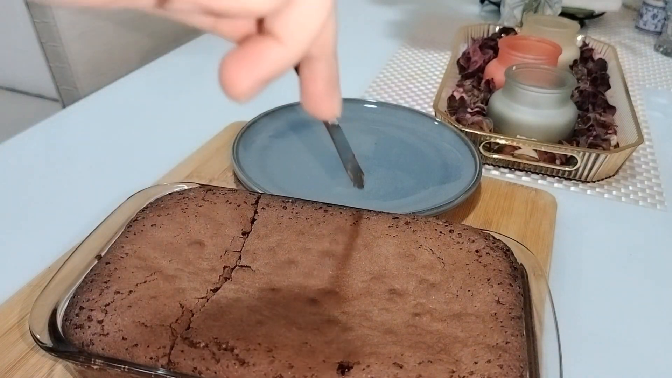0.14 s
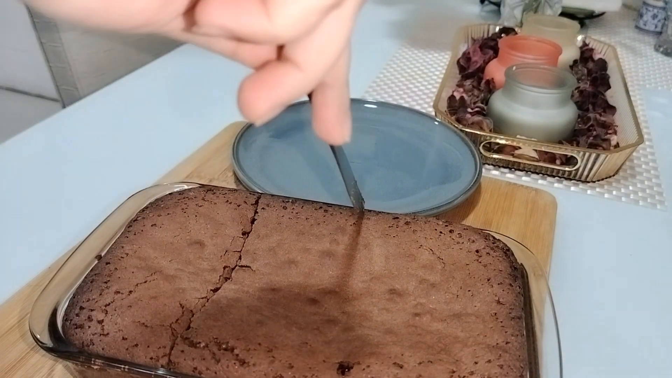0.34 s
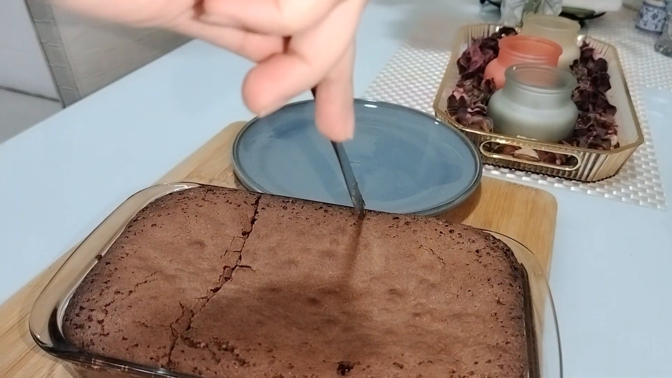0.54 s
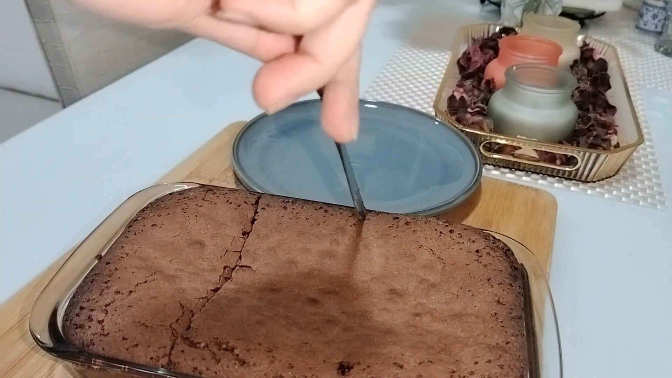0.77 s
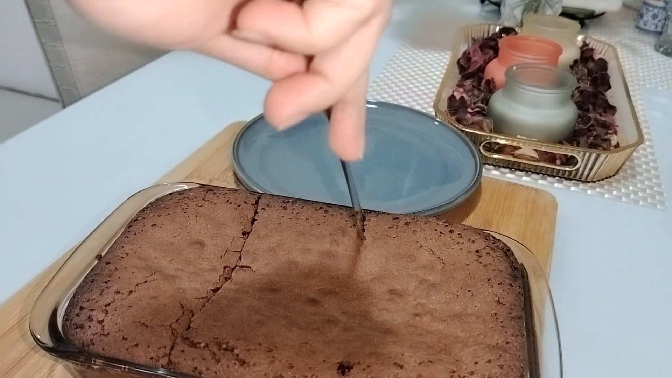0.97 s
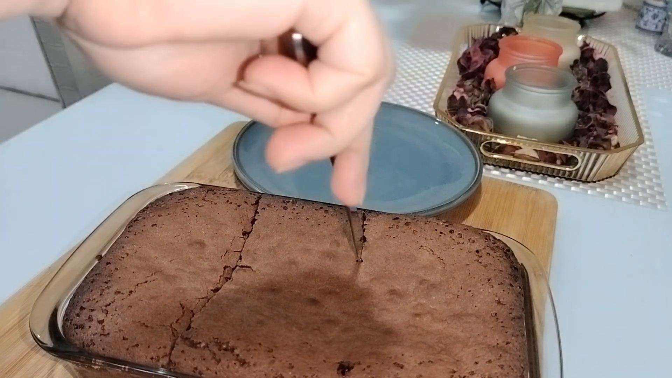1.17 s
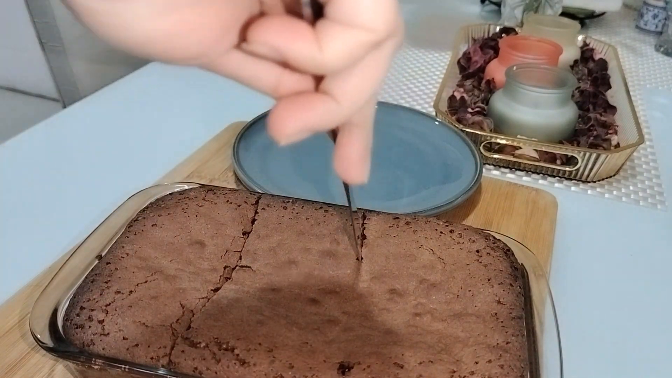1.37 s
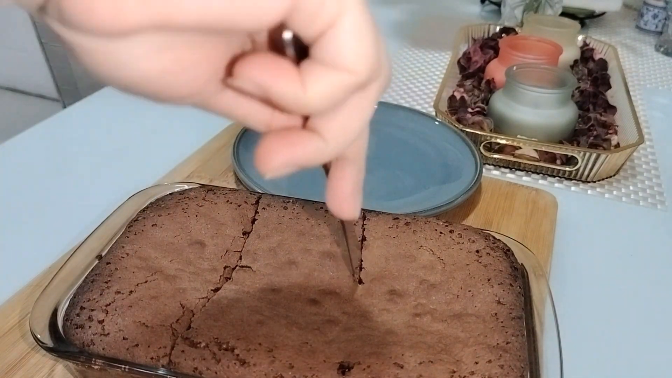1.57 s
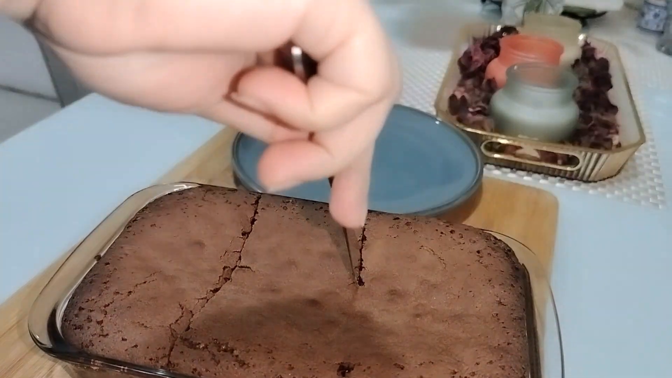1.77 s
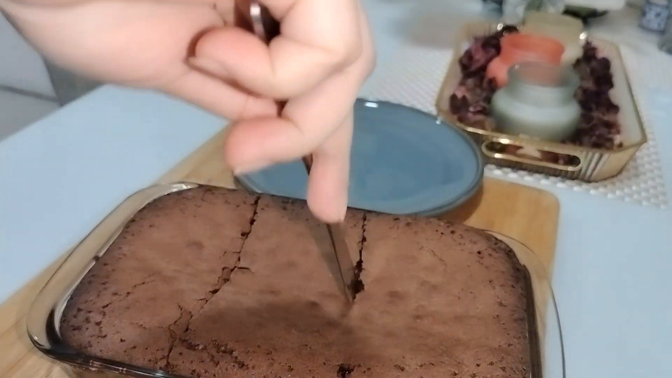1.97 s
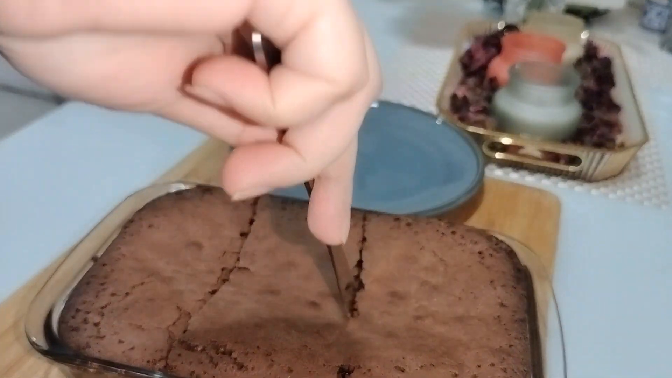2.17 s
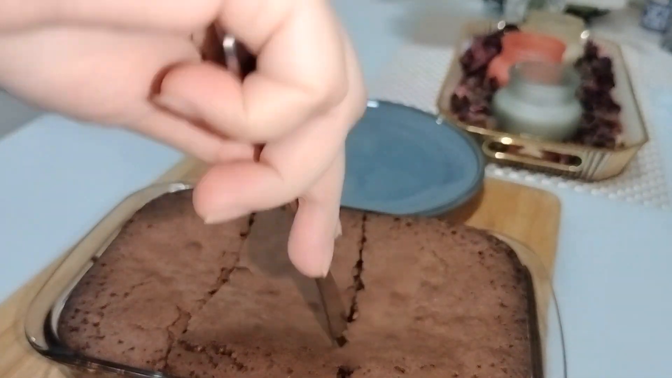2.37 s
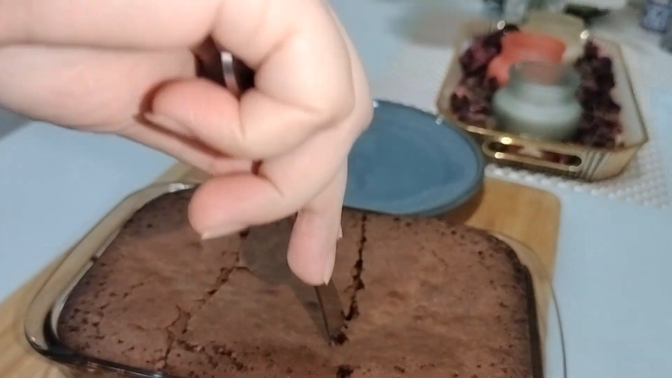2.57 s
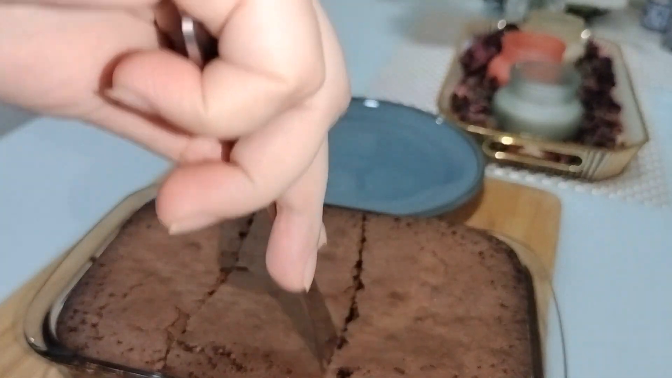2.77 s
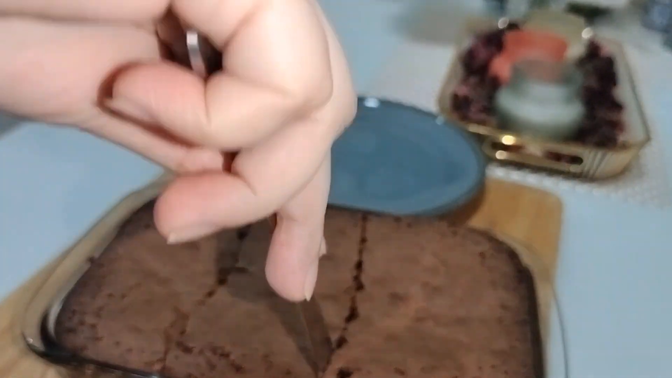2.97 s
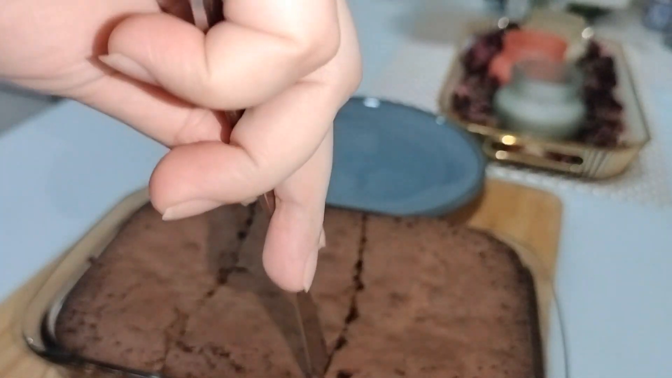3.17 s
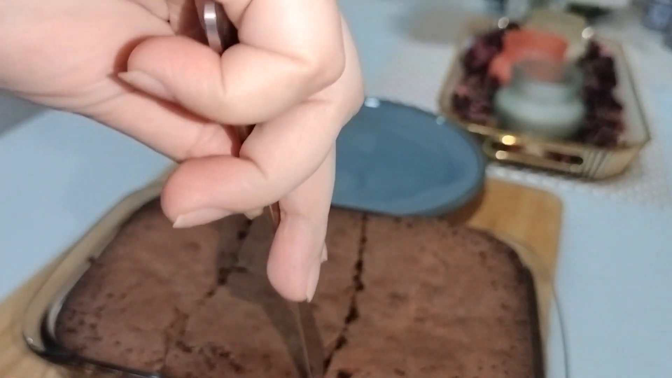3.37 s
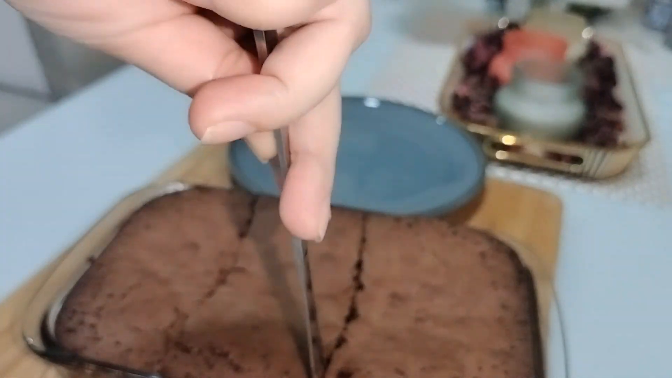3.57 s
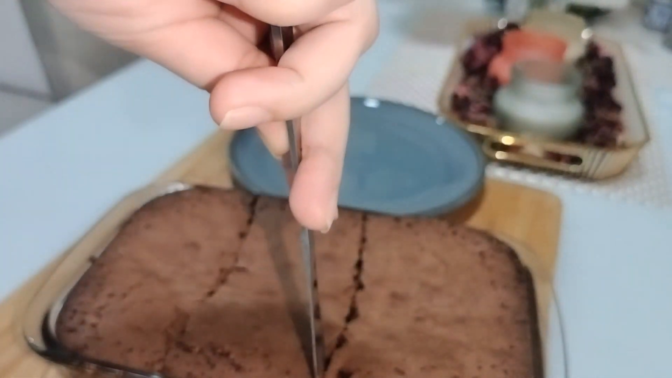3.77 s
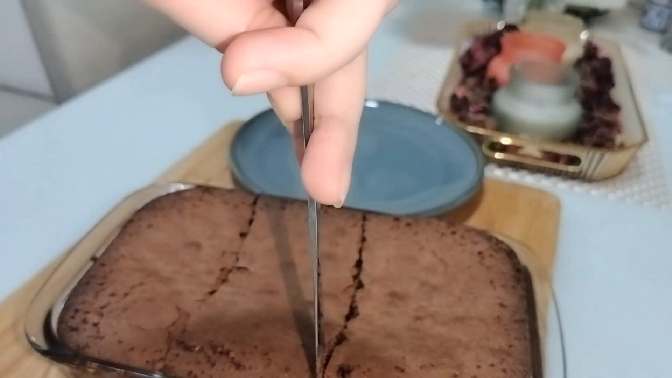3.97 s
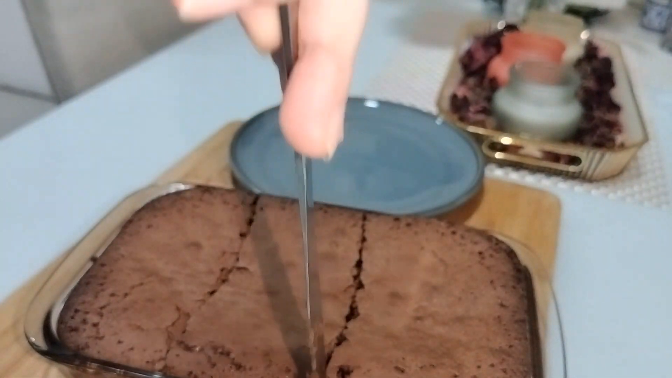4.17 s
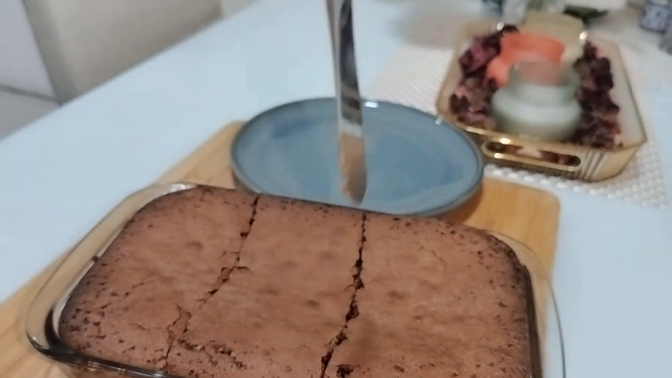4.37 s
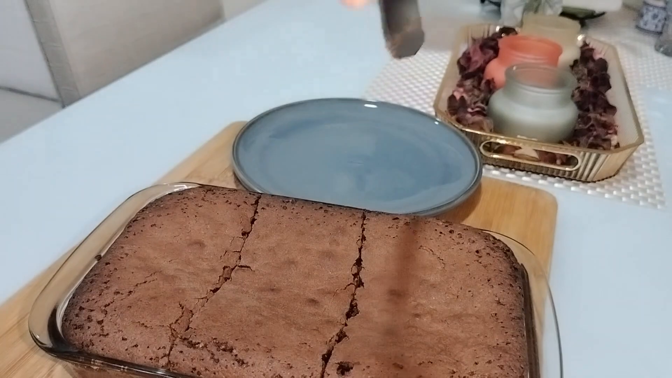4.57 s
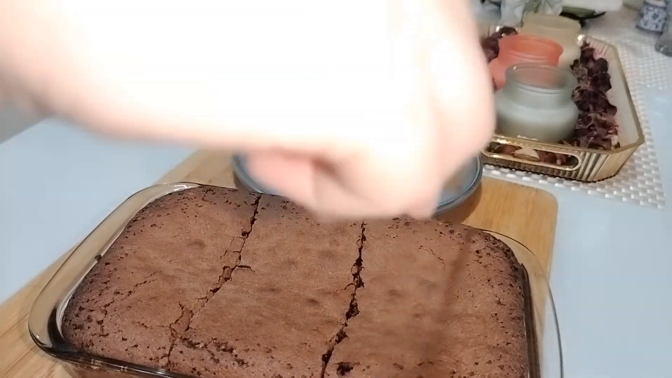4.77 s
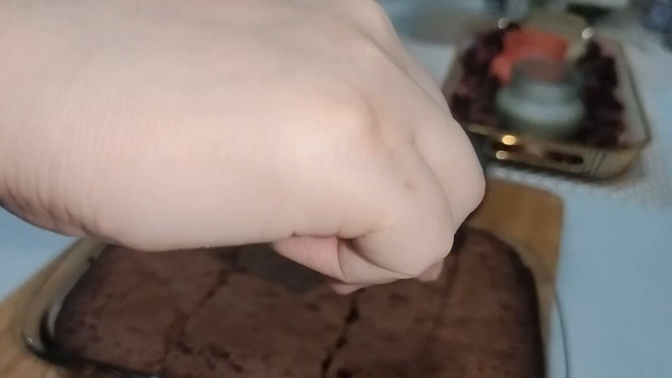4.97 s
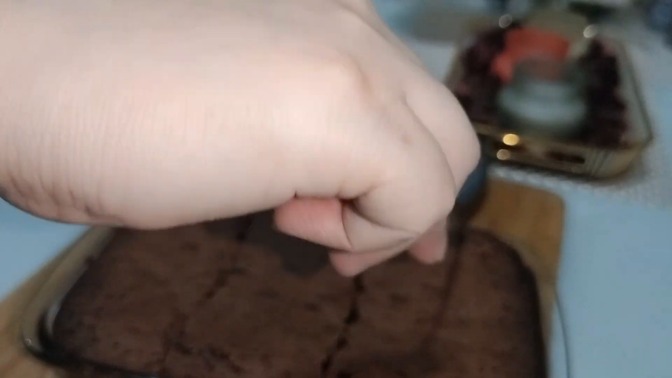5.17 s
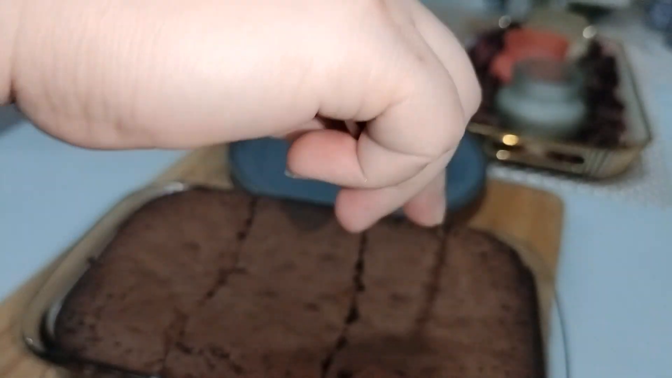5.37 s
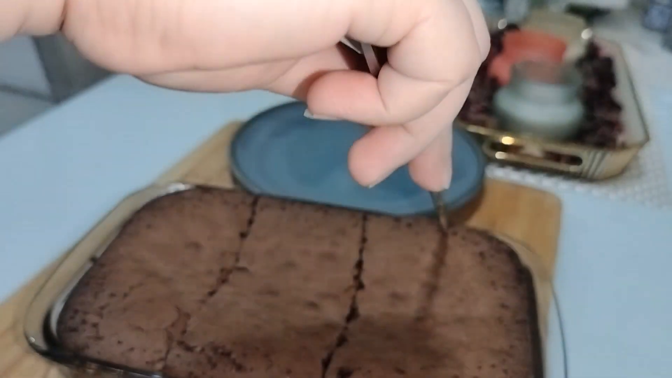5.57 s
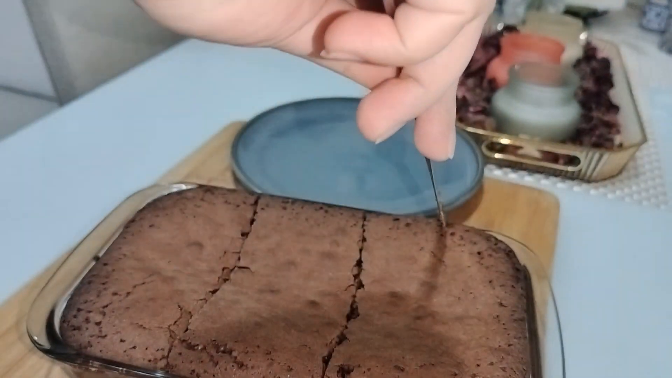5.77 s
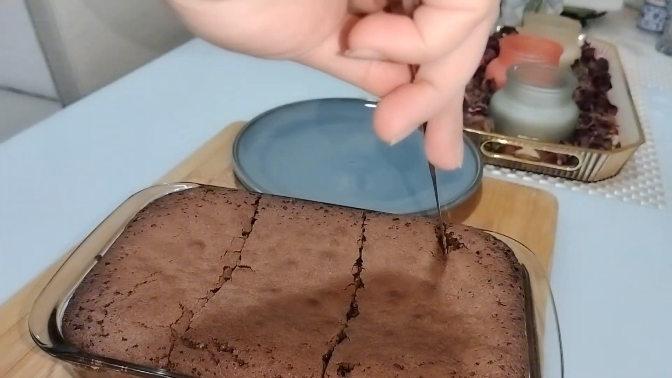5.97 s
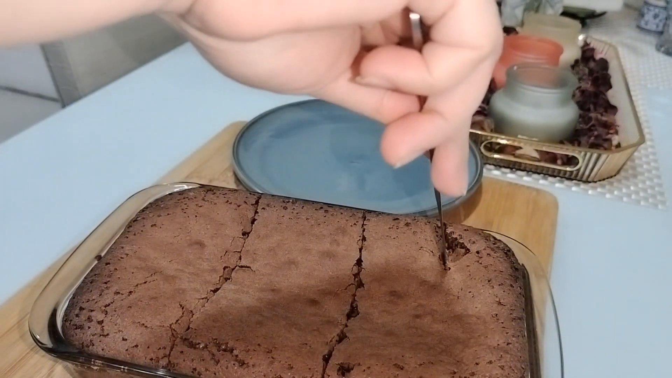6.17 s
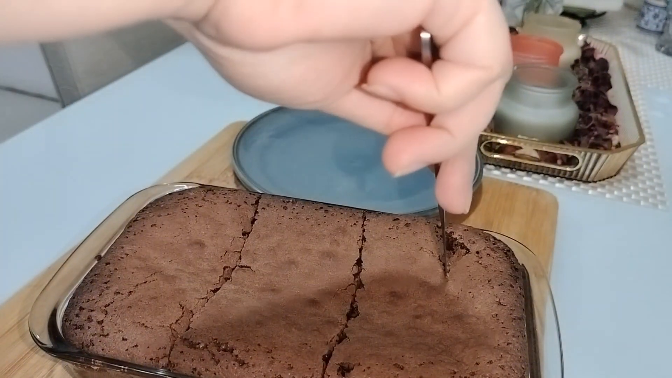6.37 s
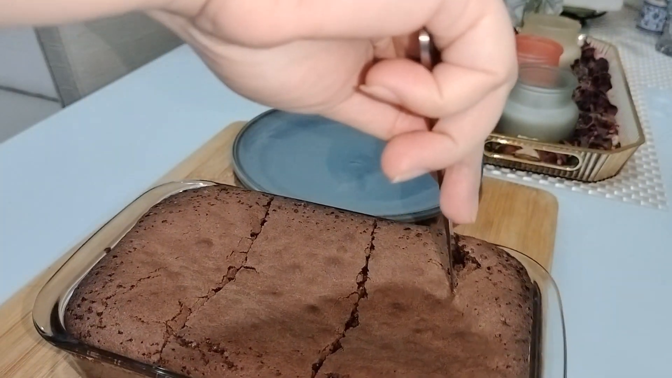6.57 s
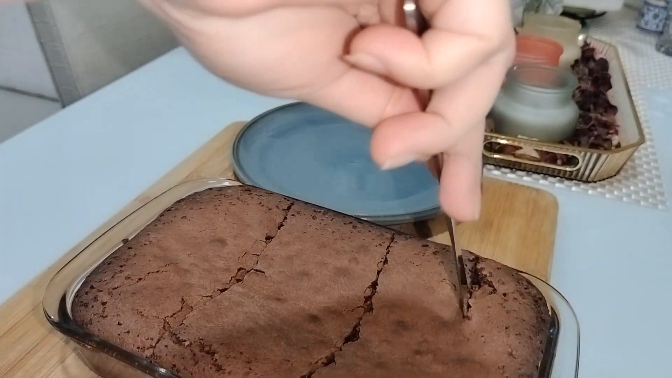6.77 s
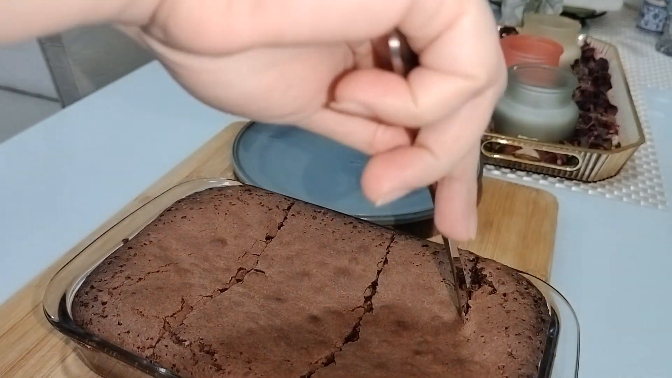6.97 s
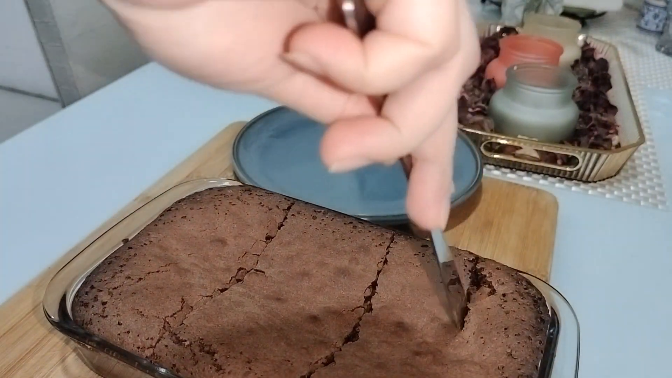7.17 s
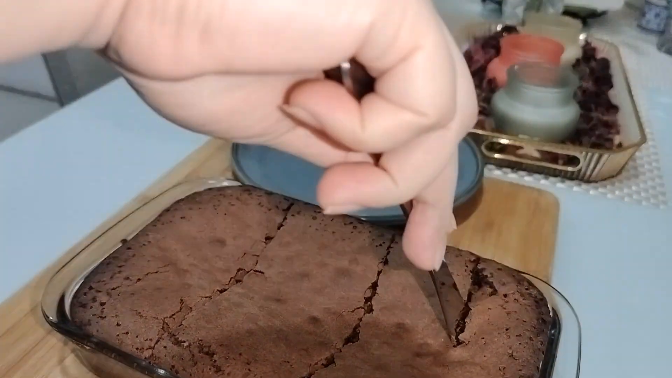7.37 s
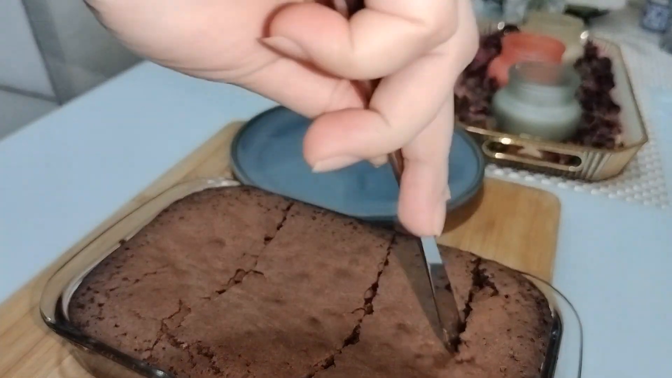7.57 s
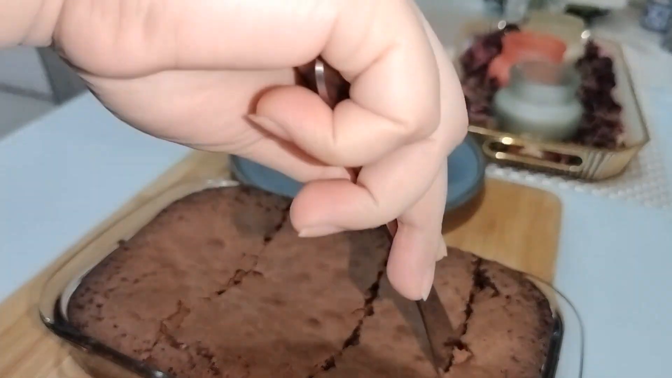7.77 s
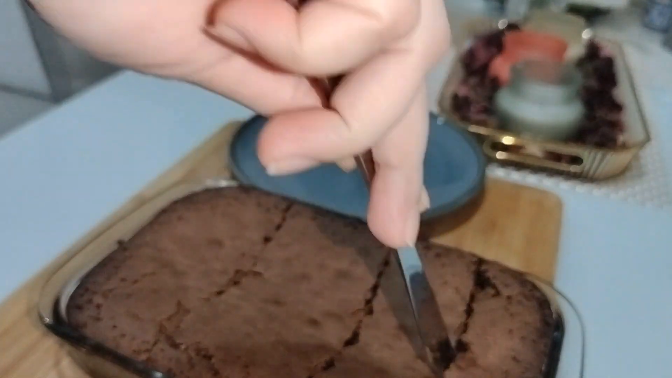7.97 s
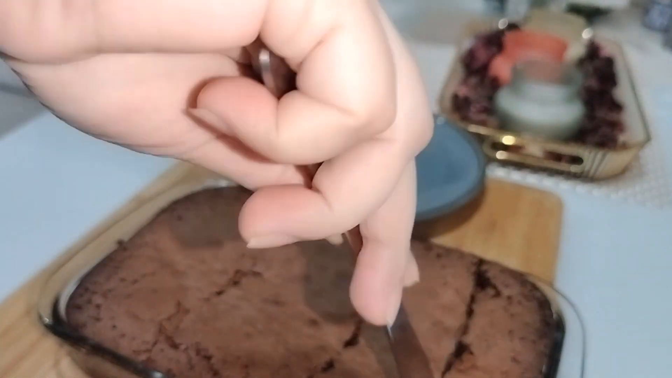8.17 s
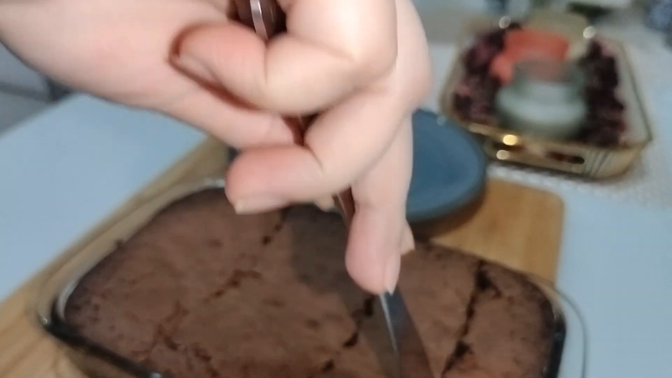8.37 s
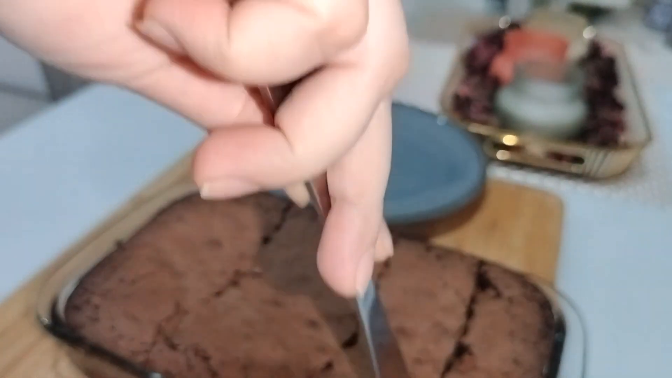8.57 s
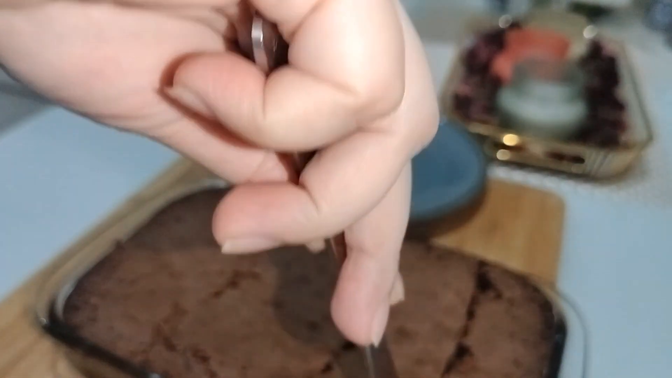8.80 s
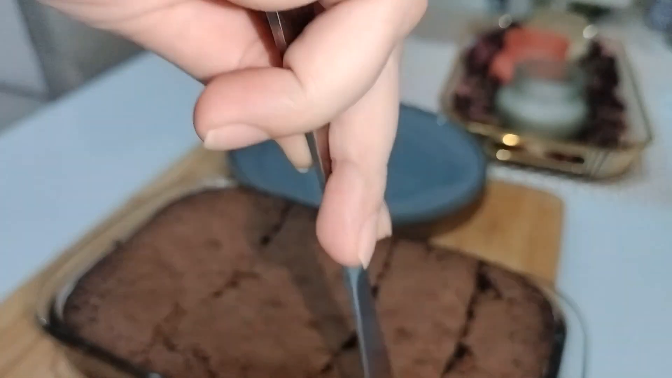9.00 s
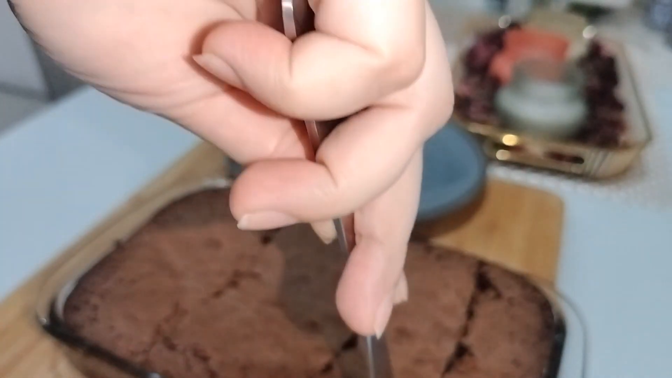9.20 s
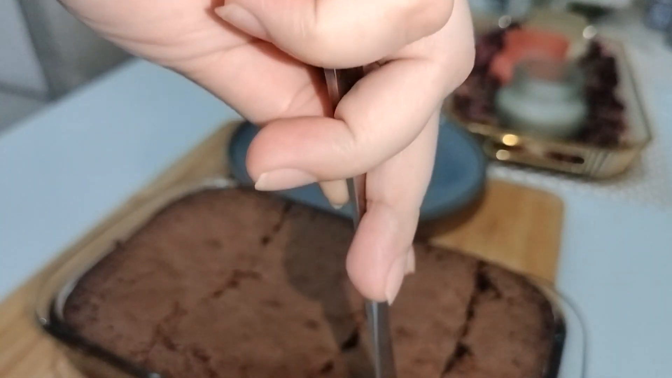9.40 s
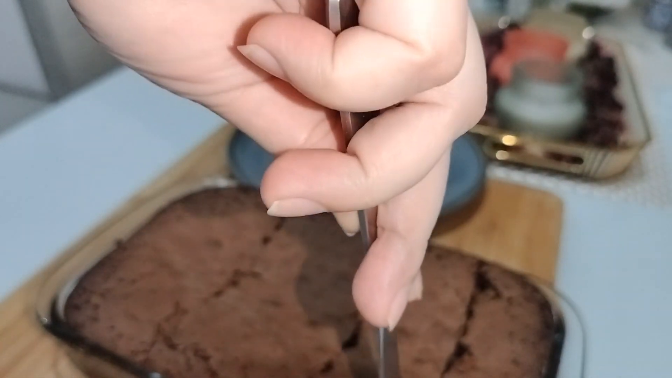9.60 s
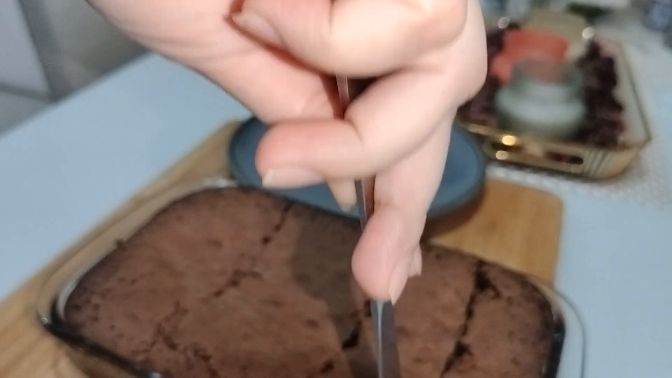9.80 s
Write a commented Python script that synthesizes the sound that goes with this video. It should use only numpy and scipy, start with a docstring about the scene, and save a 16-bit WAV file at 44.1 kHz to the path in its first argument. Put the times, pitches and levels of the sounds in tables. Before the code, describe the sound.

A table knife cuts a baked brownie in a glass dish with short dull scrapes, crust crackles and brief clicks on glass in a quiet kitchen.

```python
"""A quiet kitchen is heard first, a low rumble under faint hiss; then a table knife cuts a baked brownie in a glass dish.
Short strokes are clumps of tiny fractures: moist crumb drags dully, crust crackles and snaps through the steel.
Where the tip meets the glass it knocks or judders, ringing short, cake-damped dish modes.
Soft thumps boom in the wooden board and table, faint squeaks flutter by, and the room rings behind."""
import sys
import numpy as np
from scipy import signal
from scipy.fft import rfft, irfft, next_fast_len
from scipy.io import wavfile
from scipy.ndimage import uniform_filter1d, map_coordinates

SR = 44100
rng = np.random.default_rng(int(sys.argv[2]) if len(sys.argv) > 2 else 0)


def wav_out(sig):
    """Save sig, one row per channel (or a flat mono array), as 16-bit PCM at SR to the path in sys.argv[1]."""
    wavfile.write(sys.argv[1], SR, np.round(np.clip(np.atleast_2d(sig).T, -1, 1) * 32767).astype(np.int16))


N = 433927

# spectrum of the room at rest: (frequency [Hz], relative density [dB per Hz])
ROOM_AIR_SPECTRUM = [(20, -8.5), (35, -8), (52, 4.5), (72, -10.5), (97, 4), (118, -3.5), (140, -1),
                     (195, -5.5), (300, -19.5), (550, -24), (950, -19), (2000, -31.5), (4000, -45.5),
                     (9000, -50), (16000, -47.5)]
# left-right likeness of the room at rest: (frequency [Hz], likeness [0-1])
ROOM_AIR_LIKENESS = [(50, .95), (150, 0.9), (400, 0.4), (1000, 0), (2500, 0), (12000, 0.8)]
# decay of the kitchen reverberation: (frequency [Hz], t60 [s])
REVERB_T60 = [(100, 0.3), (500, .42), (1500, 0.32), (3000, 0.31), (6000, 0.27), (12000, 0.17)]
# strength of the reverberation: (frequency [Hz], level [dB])
REVERB_LEVEL = [(100, -8.5), (400, -2), (1200, -4), (2600, -3), (4300, -6.5), (7000, -12.5), (14000, -9.5)]
# left-right likeness of the reverberation: (frequency [Hz], likeness [0-1])
REVERB_LIKENESS = [(100, 1), (400, .7), (1000, .3), (3000, 0.056)]
# modes of board and table under the dish: (frequency [Hz], level [dB], t60 [s])
TABLE_MODES = [(53.4, -10.5, .15), (96, -6.5, .1), (139.8, -1.5, 0.54), (178, 0, 0.064),
               (249.5, -7.5, 0.31), (334.4, -19, .07)]
# soft thumps as the blade breaks through:
# (time [s], level [dB], pitch [Hz], share passed to the table [dB])
PUSHES_THROUGH = [(1, -38.5, 252, -3.5), (1.111, -32, 251, -16), (1.606, -39.5, 201, 4.5),
                  (2.048, -43.5, 187, 4), (2.437, -47, 48, -3), (6.565, -45, 149, 7),
                  (6.598, -45.5, 313, -6), (8.029, -45.5, 530, 0), (8.193, -38.5, 114.4, 14),
                  (8.195, -34.5, 241.5, -6.5), (8.669, -40, 52.4, 0), (9.063, -43.5, 218, 4)]
# faint squeaks and rasps:
# (time of the swell's top [s], half length [s], pitch [Hz], width of each resonance [Hz], relative level [dB])
SQUEAK_TONES = [(0.994, 0.051, 2020, 700, -61.5), (1.867, 0.035, 5530, 150, -74),
                (3.748, .08, 3610, 60.1, -86), (4.694, 0.056, 1936, 120.4, -76),
                (5.463, .012, 5580, 120, -77), (6.582, 0.068, 6400, 448, -70.5),
                (6.858, 0.011, 5630, 220, -70), (7.5, .04, 5560, 130, -84),
                (7.086, 0.06, 5600, 132.4, -80.5), (7.231, 0.0072, 5500, 200, -55.5),
                (7.63, .03, 5500, 130, -79)]
# modes of the filled dish with the knife on it: (frequency [Hz], relative level [dB], t60 [s])
DISH_MODES = [(460, -26, 0.089), (606, -22.5, .029), (1118, -11, 0.022), (1247, -16.5, 0.038),
              (1518, -18, 0.0098), (1687, -12.5, 0.026), (1860, -6.5, 0.029), (2150, -8, .016),
              (2433, -5, 0.014), (2675, -6, .022), (2950, -4.5, 0.009), (3370, -12, 0.008),
              (3750, -13.5, .0086), (4200, -6.5, 0.014), (5210, -6.5, .01), (5500, -11.5, .0053),
              (6293, -9, .006), (6900, -1, 0.013), (8374, -20, 0.0074), (10700, -24.5, .013),
              (12200, -43, 0.0037)]
# knocks of the tip as it sticks and slips: (time [s], level of the first 3 ms, without table boom [dB])
TIP_KNOCKS = [(2.437, -34), (3.2982, -18), (3.308, -28.5), (3.419, -44.5), (4.0219, -31), (4.027, -25),
              (4.0446, -25.5), (4.0623, -30.5), (4.0756, -25), (4.0822, -34.5), (4.092, -27),
              (4.106, -26.5), (4.1192, -29.5), (4.1318, -25), (9.132, -35), (9.1437, -32.5),
              (9.1579, -33.5), (9.1727, -35), (9.189, -32), (9.206, -33), (9.2275, -36), (9.4838, -31.5),
              (9.5001, -27), (9.5155, -28), (9.5342, -30.5)]
# places where the tip meets the glass:
# (from time [s], treble from hardness of contact [dB], its change as the tip slides on [dB per s],
#  pitch favoured by that spot [Hz], by how much [dB], share passed to the table [dB])
GLASS_CONTACTS = [(2.432, -25.5, 0, 2150, 5, -4.5), (3.29, 7, -2, 4150, 9, -23),
                  (3.305, -10.5, 0.5, 1780, 6, -19), (4.02, 1.5, -9, 2990, 8.5, -31.5),
                  (9.13, -15.5, -100, 2440, 2.5, -9.5), (9.48, -9, -31, 2420, 4.5, -16.5)]
# resonances of the blade, damped by hand and cake: (frequency [Hz], width [Hz], gain [dB])
BLADE_MODES = [(5690, 50, 4), (6835, 240, 10), (8630, 420, -2.5), (10040, 770, -1.5), (14270, 500, 0.5)]
# larger flakes of crust snapping: (time [s], relative peak level [dB])
CRUST_SNAPS = [(1.0855, -38), (1.1091, -34.5), (1.355, -48), (1.5436, -41), (2.006, -40), (2.0253, -35.5),
               (2.235, -39.5), (2.8154, -44), (2.88, -53), (3.238, -44), (3.275, -31.5), (6.8534, -48.5),
               (7.232, -43), (7.249, -33), (7.6992, -35.5), (7.713, -33), (8.188, -36), (8.3709, -36),
               (8.508, -37.5), (8.5352, -41.5), (8.5809, -40), (8.8681, -38)]
# crumb dragging on the blade: (frequency [Hz], relative density [dB per Hz])
CRUMB_SPECTRUM = [(25, 0.5), (55, 6.5), (100, -3.5), (170, 5), (235, 3), (350, 1), (520, -3.5), (780, -8),
                  (1250, -7.5), (1700, -8), (2200, -9.5), (3200, -18.5), (5000, -25), (9000, -43.5)]
# crust breaking, before the blade colours it: (frequency [Hz], relative density [dB per Hz])
CRUST_SPECTRUM = [(900, -13), (2000, -10), (3400, -7.5), (4500, -5.5), (6200, -2), (7200, -0.5),
                  (8000, -4.5), (10500, -11), (12500, -23), (15500, -20)]
# strokes of the blade:
# (start [s], length [s], crumb drag [dB], crust crackle [dB], growth from start to end [dB])
BLADE_STROKES = [(0.957, 0.11, -58, -69, -1.5), (1.081, 0.042, -49, -62.5, 0), (1.295, 0.076, -64, -73, 8),
                 (1.425, 0.026, -59, -72, -7), (1.534, 0.0098, -51.5, -63, 15),
                 (1.571, 0.033, -58.5, -68, 7), (1.777, .155, -59, -72.5, -0.5),
                 (1.999, 0.038, -51.5, -59.5, 2.5), (2.175, 0.059, -54, -69, 12),
                 (2.242, 0.083, -54.5, -64, -7), (2.376, 0.042, -50, -54, 3.5),
                 (2.607, .13, -59.5, -68, -3), (2.766, .015, -61, -79, 6), (2.812, 0.063, -54, -54.5, 7),
                 (3.005, .075, -78, -74, -4), (3.2, .09, -63, -63, 21), (3.95, 0.014, -58.5, -67, 2),
                 (5.003, .04, -66.5, -74.5, -4), (5.899, 0.074, -66, -67, -1.5),
                 (5.981, 0.41, -72.5, -77.5, 2), (6.523, 0.17, -68, -73.5, 3.5),
                 (6.844, 0.015, -56, -64, 0), (7.011, 0.11, -78.5, -80, -7.5),
                 (7.228, 0.067, -55.5, -61, 1.5), (7.434, 0.11, -83, -78, -0.5),
                 (7.66, 0.03, -69.5, -72, 3), (7.701, 0.05, -59.5, -60.5, -12),
                 (7.901, 0.039, -70.5, -70.5, 1), (8.016, 0.1, -63.5, -74, -4),
                 (8.105, 0.067, -64.5, -61.5, 2), (8.177, 0.008, -52, -47.5, 2),
                 (8.349, 0.14, -69.5, -63.5, -2), (8.576, 0.087, -60.5, -56.5, -0.5),
                 (8.851, 0.079, -79, -69, -3), (9.053, 0.09, -62.5, -64.5, -10.5),
                 (9.466, .012, -60.5, -66, 3)]

AIR_DB = -57
CUTOFF_HZ = 15800
# the blade bites quickly and the crumb settles after it
BITE_S, SETTLE_S = 0.0044, 0.01132
# before the bite the blade eases in at this share of the stroke
EASE_DB, EASE_S = -16, 0.025
# after each knock the tip grazes the glass once more; the jitter is a share of the delay
GRAZE_S, GRAZE_DB, GRAZE_JITTER = .008, -11.5, .25
# the wide dish reaches the two microphones out of step in this band
DISH_SPREAD_LOW_HZ, DISH_SPREAD_HIGH_HZ, DISH_SPREAD_DB = 450, 2300, -6.5


def from_db(db):
    """Turn decibels into gain."""
    return 10 ** (np.asarray(db) / 20)


def rms_one(x):
    """Scale to unit power."""
    return x / np.sqrt(np.mean(x ** 2) + 1e-20)


def at_hz(points, hz):
    """Read a table along a log-frequency axis."""
    points = np.array(points)
    return np.interp(np.log(np.maximum(hz, 1)), np.log(points[:, 0]), points[:, 1])


def bins(size):
    """Frequencies in the spectrum of a sound of this many samples."""
    return np.fft.rfftfreq(size, 1 / SR)


def colour(x, spectrum):
    """Give x a smooth spectrum, at rms 1."""
    size = next_fast_len(N)
    gain = from_db(at_hz(spectrum, bins(size)))
    return rms_one(irfft(rfft(x, size) * gain, size)[..., :N])


def resonate(x, hz, width):
    """Ring x through a single resonance with gain 1 at its peak."""
    r = np.exp(-np.pi * width / SR)
    feed = np.array([1, 0, -1]) * (1 - r * r) / 2
    return signal.lfilter(feed, [1, -2 * r * np.cos(2 * np.pi * hz / SR), r * r], x + 1e-18)


def bandpass(x, low_hz, high_hz):
    """Keep the band between two frequencies."""
    return signal.sosfilt(signal.butter(2, [low_hz, high_hz], "band", fs=SR, output="sos"), x)


def drift(rate):
    """Random wandering at rms 1, with this many turning points per second."""
    knots = rng.standard_normal(int(N / SR * rate) + 2)
    return rms_one(np.interp(np.arange(N) / SR * rate, np.arange(len(knots)), knots))


def stereo_noise(likeness, size):
    """White noise at two microphones, alike by frequency."""
    mid, side = rfft(rng.standard_normal((2, size)))
    alike = np.clip(at_hz(likeness, bins(size)), 0, 1)
    shared = np.sqrt((1 + alike) / 2) * mid
    opposed = np.sqrt((1 - alike) / 2) * side * [[1], [-1]]
    return irfft(shared + opposed, size)


def add(out, s, sound):
    """Mix a sound in at time s."""
    start = round(s * SR)
    out[..., start:start + sound.shape[-1]] += sound[..., :N - start]


def room_air(whine_hz=6970, whine_width=260, whine_db=-93):
    """Low rumble of the house and microphone hiss, shaped from noise, with a faint high whine."""
    whine = rms_one(resonate(rng.standard_normal((2, N)), whine_hz, whine_width))
    air = colour(stereo_noise(ROOM_AIR_LIKENESS, size=next_fast_len(N)), ROOM_AIR_SPECTRUM)
    return from_db(AIR_DB) * air + from_db(whine_db) * whine


def reverb_tail(t, build_s=0.0016):
    """Noise in narrow bands, each building up and dying at its own rate, sooner in the high treble."""
    white, hz_bins, tail = rfft(stereo_noise(REVERB_LIKENESS, size=len(t))), bins(len(t)), 0
    edges = np.geomspace(40, 20000, 19)
    for low, high in zip(edges, edges[1:]):
        hz = np.sqrt(low * high)
        fade = np.exp(-np.log(1000) * t / at_hz(REVERB_T60, hz)) * (1 - np.exp(-t / build_s))
        band = irfft(white * ((hz_bins >= low) & (hz_bins < high)), len(t))
        tail = tail + from_db(at_hz(REVERB_LEVEL, hz)) * band * fade / np.linalg.norm(fade)
    return tail


def near_scatter(t, near_s=0.002, near_hz=600):
    """Quick scatter from table and hand; only short waves differ towards the two microphones."""
    burst = rng.standard_normal((2, len(t))) * t * np.exp(-2 * t / near_s)
    near = rms_one(burst) / np.sqrt(len(t))
    return signal.sosfilt(signal.butter(2, near_hz, "high", fs=SR, output="sos"), near + 1e-18)


def kitchen(x, near_db=-8, left_db=0.69, right_db=-0.13, right_lag_s=.000045):
    """Direct sound, quick near scatter, then the room's tail."""
    t = np.arange(SR * 2 // 3) / SR
    response = reverb_tail(t) + from_db(near_db) * near_scatter(t)
    # the knife is a little closer to the left microphone
    late_right = map_coordinates(x, [np.arange(N) - right_lag_s * SR], order=3)
    direct = np.stack([x, late_right])
    reflected = signal.fftconvolve(x[None], response, axes=1)[:, :N]
    return (direct + reflected) * from_db([[left_db], [right_db]])


def table_ring():
    """The boom of board and table after a unit blow, a sum of dying modes."""
    t = np.arange(SR // 2) / SR
    return sum(from_db(db - 60 * t / t60) * np.sin(2 * np.pi * hz * t) for hz, db, t60 in TABLE_MODES)


def pushes(cycles=1.3):
    """The cake gives way with a dull, fast-dying wobble that also shakes the table."""
    out, boom, t = np.zeros(N), table_ring(), np.arange(SR // 6) / SR
    for s, db, hz, table_db in PUSHES_THROUGH:
        wobble = np.sin(2 * np.pi * hz * t) * np.exp(-t * hz / cycles)
        shaken = signal.fftconvolve(boom, wobble / np.abs(wobble).sum())
        add(out, s, from_db(db) * wobble)
        add(out, s, from_db(db + table_db) * shaken)
    return out


def squeaks(flutter_db=4):
    """Thin, fluttering tones, noise through two sharp resonances, that swell and fade."""
    out, t = np.zeros(N), np.arange(-SR // 5, SR // 5) / SR
    for s, half, hz, width, db in SQUEAK_TONES:
        once = resonate(rng.standard_normal(len(t)), hz, width)
        tone = rms_one(resonate(once, hz, width))
        add(out, s + t[0], from_db(db) * np.exp(-(t / half) ** 2) * tone)
    return out * rms_one(from_db(flutter_db * drift(90)))


def contact_at(s):
    """Treble, favoured pitch, its boost and thud share of the place the tip is on at time s."""
    place = max(sum(row[0] <= s for row in GLASS_CONTACTS) - 1, 0)
    start, treble_db, slide_db_per_s, *spot = GLASS_CONTACTS[place]
    return treble_db + slide_db_per_s * (s - start), *spot


def touches():
    """Every knock and the lighter graze that follows it, as (time [s], level [dB])."""
    delays = GRAZE_S * (1 + GRAZE_JITTER * rng.uniform(-1, 1, len(TIP_KNOCKS)))
    grazes = [(s + delay, db + GRAZE_DB) for (s, db), delay in zip(TIP_KNOCKS, delays)]
    return list(TIP_KNOCKS) + grazes


def dish_ring(t, treble_db, spot_hz, spot_db, detune=0.009, spread_s=0.000615, spot_octaves=0.13, hard_hz=2500):
    """Damped glass modes; harder contact favours the high ones, each spot its own few."""
    hz, mode_db, t60 = np.array(DISH_MODES).T[:, :, None]
    shift, lateness = rng.standard_normal((2, len(DISH_MODES), 1))
    hardness_db = treble_db / (1 + (hard_hz / hz) ** 5)
    favour_db = spot_db * np.exp(-(np.log2(hz / spot_hz) / spot_octaves) ** 2)
    # bending waves cross the glass, so each mode speaks a little late
    age = np.maximum(t - spread_s * np.abs(lateness), 0)
    gain = from_db(mode_db + hardness_db + favour_db) * np.exp(-np.log(1000) * age / t60)
    modes = np.sign(lateness) * gain * np.sin(2 * np.pi * hz * (1 + detune * shift) * age)
    return np.sum(modes, axis=0)


def knocks(crack_db=-9, crack_s=0.0025, contact_hz=12000):
    """The tip sticks and slips on the glass: dish ring, gritty scratch and a thud in the table."""
    out, t, boom = np.zeros(N), np.arange(SR // 16) / SR, table_ring()
    attack = 3 * SR // 1000  # 3 ms
    for s, db in touches():
        treble_db, spot_hz, spot_db, thud_db = contact_at(s)
        ring = dish_ring(t, treble_db, spot_hz, spot_db)
        # the slip itself is a brief gritty scratch
        crack = bandpass(rng.standard_normal(len(t)) * np.exp(-t / crack_s), 1000, 6500)
        crack_gain = from_db(crack_db + treble_db / 2)
        knock = ring / np.std(ring[:attack]) + crack_gain * crack / np.std(crack[:attack])
        add(out, s, from_db(db) * knock / np.std(knock[:attack]))
        add(out, s, from_db(db + thud_db) * boom)
    # the contact lasts too long to excite the very top
    return signal.sosfilt(signal.butter(2, contact_hz, fs=SR, output="sos"), out + 1e-18)


def dish_width(x):
    """Opposite sides of the dish push and pull, a quarter cycle apart from its main motion."""
    band = bandpass(x + 1e-18, DISH_SPREAD_LOW_HZ, DISH_SPREAD_HIGH_HZ)
    side = -np.imag(signal.hilbert(band, next_fast_len(N)))[:N]
    return from_db(DISH_SPREAD_DB) * side * [[1], [-1]]


def blade(x):
    """The steel lends its resonances to whatever breaks against it."""
    return x + sum(from_db(db) * resonate(x, hz, width) for hz, width, db in BLADE_MODES)


def snaps(decay_s=0.0026, low_hz=700, high_hz=6000, level_db=-4):
    """A flake gives way in a noise burst of a few milliseconds, coloured by the blade."""
    out, t = np.zeros(N), np.arange(SR // 50) / SR
    for s, db in CRUST_SNAPS:
        crack = rng.standard_normal(len(t)) * np.exp(-t / decay_s)
        burst = blade(bandpass(crack, low_hz, high_hz))
        add(out, s, from_db(db + level_db) * burst / np.abs(burst).max())
    return out


def grains(per_s, spread_db, clump_db):
    """Tiny fractures of uneven size that come in clumps, evened out over about 40 ms."""
    sizes = from_db(spread_db * np.minimum(rng.exponential(1, N), 4)) * rng.choice([-1, 1], N)
    fractures = rng.random(N) < per_s / SR
    clicks = sizes * fractures * from_db(clump_db * drift(160))
    return clicks / np.sqrt(np.abs(uniform_filter1d(clicks ** 2, size=1800)) + 1e-9)


def wander(x, shift_db=3.5, rate=14):
    """Crumbs of changing size: each part of the spectrum swells and fades on its own."""
    size, out = next_fast_len(N), 0
    spectrum = rfft(x, size)
    octave = np.clip(np.log2(np.maximum(bins(size), 1) / 200), 0, 6)  # above 200 Hz
    for k in range(13):  # overlapping bands, half an octave apart
        share = np.maximum(1 - np.abs(2 * octave - k), 0)
        out = out + irfft(spectrum * share, size)[:N] * from_db(shift_db * drift(rate))
    return rms_one(out)


def stroke_shape(t, length, growth_db):
    """The blade eases in, bites, presses on with growing or fading force, and stops."""
    before, after = np.maximum(-t, 0), np.maximum(t - length, 0)
    ease = from_db(EASE_DB) * np.exp(-before / EASE_S)
    bite = np.clip(t / BITE_S, 0, 1)
    force = from_db(growth_db * (np.clip(t / length, 0, 1) - .5))
    return np.maximum(bite, ease) * force * np.exp(-after / SETTLE_S)


def cutting():
    """Each stroke drags through moist crumb and crackles the crust: two streams of fractures."""
    t = np.arange(-SR // 5, SR * 2 // 3) / SR
    drag, crackle = np.zeros(N), np.zeros(N)
    for s, length, drag_db, crackle_db, growth_db in BLADE_STROKES:
        shape = stroke_shape(t, length, growth_db)
        add(drag, s + t[0], from_db(drag_db) * shape)
        add(crackle, s + t[0], from_db(crackle_db) * shape)
    crumb = wander(colour(grains(per_s=2200, spread_db=3.5, clump_db=3.5), CRUMB_SPECTRUM))
    crust = wander(blade(colour(grains(per_s=1200, spread_db=2.0, clump_db=3.5), CRUST_SPECTRUM)))
    return drag * crumb + crackle * crust


def scene():
    """Knife, cake, dish and table sound in the kitchen, over the room at rest."""
    cake, dish = cutting() + snaps(), knocks()
    return room_air() + kitchen(pushes() + squeaks() + dish + cake) + dish_width(dish)


def record(dry):
    """Cut the top steeply."""
    return signal.sosfilt(signal.ellip(10, .1, 70, CUTOFF_HZ, fs=SR, output="sos"), dry)


dry = scene()
out = record(dry)
wav_out(out)
```